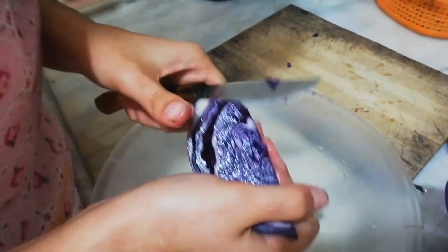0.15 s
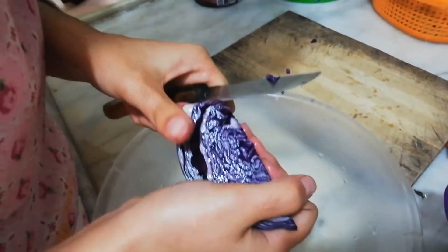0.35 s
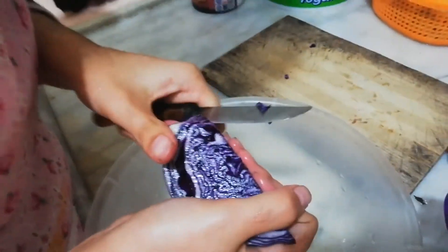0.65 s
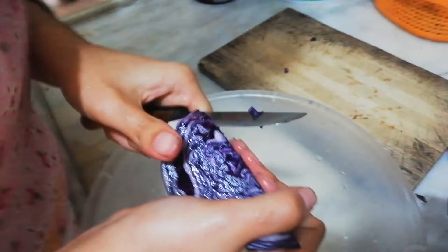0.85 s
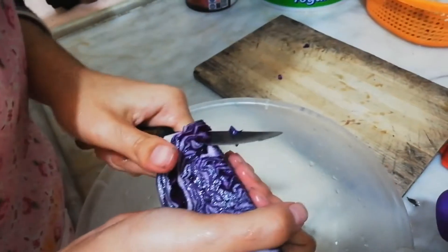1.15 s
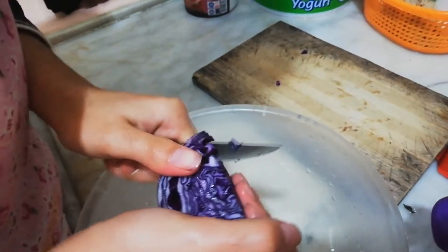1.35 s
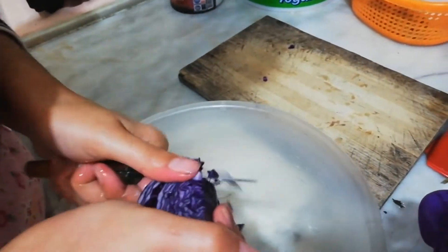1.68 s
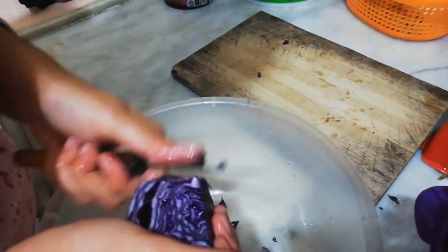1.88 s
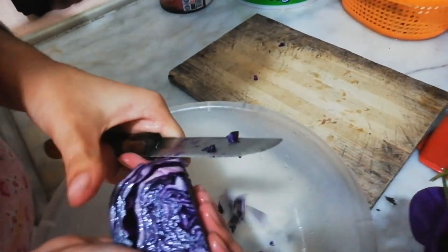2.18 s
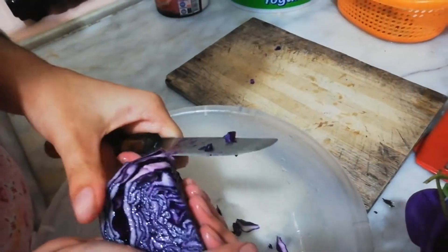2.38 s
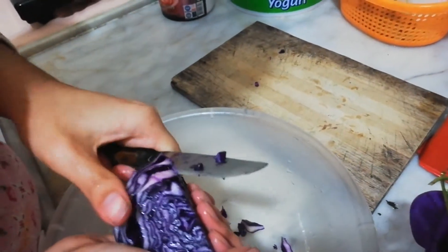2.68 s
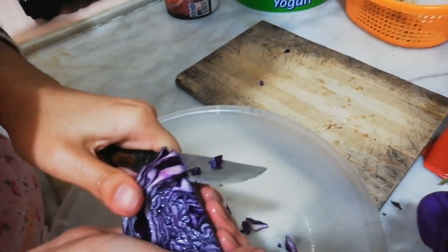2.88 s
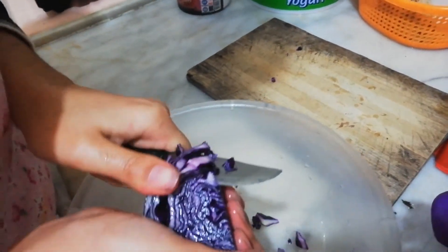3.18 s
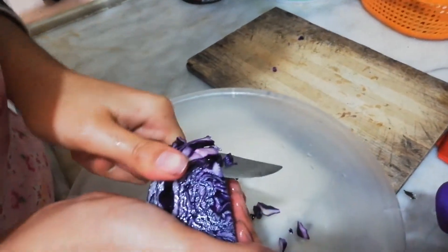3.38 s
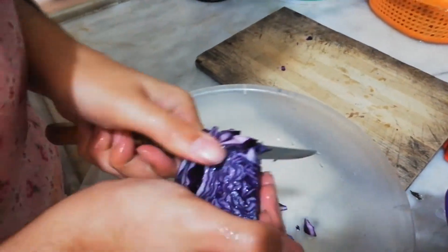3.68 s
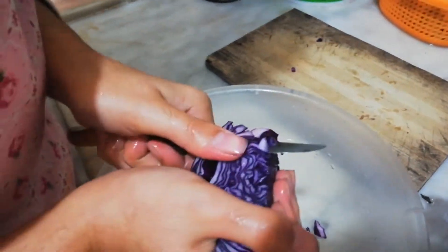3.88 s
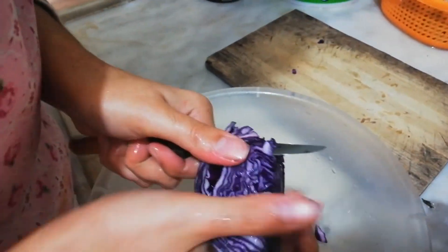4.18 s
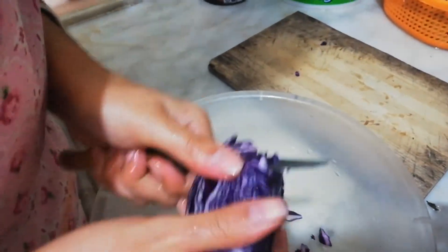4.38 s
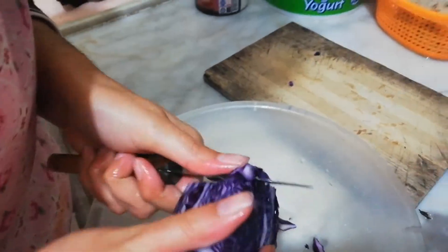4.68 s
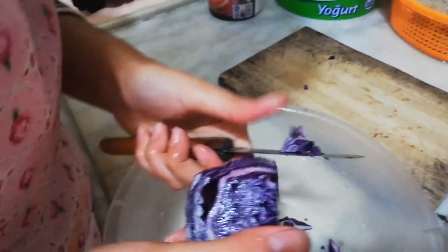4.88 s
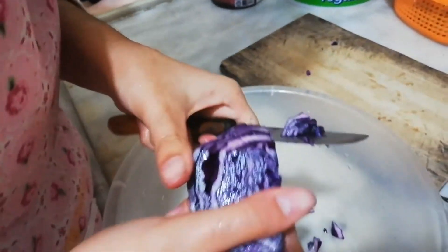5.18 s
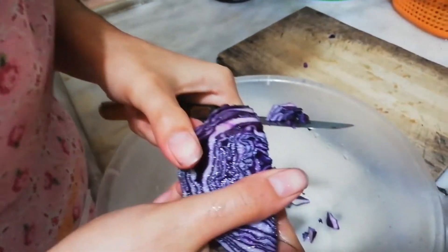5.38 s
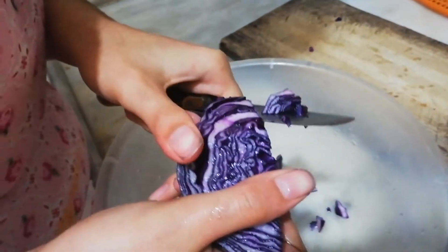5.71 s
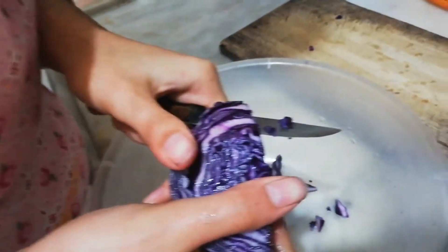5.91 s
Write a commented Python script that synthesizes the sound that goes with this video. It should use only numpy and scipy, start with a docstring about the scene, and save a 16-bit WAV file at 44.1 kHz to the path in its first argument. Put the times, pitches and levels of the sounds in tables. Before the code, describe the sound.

Crackling, squeaky-crisp cuts through dense cabbage leaves, hollow plastic taps, a brief burst of metal clatter across the kitchen, and running water at the end.

```python
"""Cutting a cabbage over a bowl

A knife is pushed through a cabbage held over a plastic bowl: bursts of tiny clicks make the leaves crack,
a fine crackle follows the blade, dull noise swells, and cut pieces land and ring the bowl's modes.
Across the kitchen a pot is set down, a lid settles, cutlery clatters and clinks: impacts ring metal modes.
Soft hollow knocks come from sink, worktop and bowl, and a tap opens with hissing noise.
A low room hum wavers, something whistles faintly, and background noise lies under it all, in stereo."""
import sys
import numpy as np
from scipy import signal
from scipy.fft import rfft, irfft, next_fast_len
from scipy.io import wavfile
from scipy.ndimage import uniform_filter1d

SR = 44100
rng = np.random.default_rng(int(sys.argv[2]) if len(sys.argv) > 2 else 0)


def decibels_to_gain(level_db):
    """Convert a level in decibels to a linear amplitude gain (20 dB per decade)."""
    exponent = np.asarray(level_db, float) / 20
    return 10 ** exponent


def persist_wave(psi):
    """Save psi, clipped to +-1, as 16-bit WAV."""
    counts = np.round(np.clip(psi, -1, 1) * 32767).astype(np.int16)
    wavfile.write(sys.argv[1], SR, np.atleast_2d(counts).T)


N = 266805  # length in samples, about 6 s

# Spectrum tables give relative levels: only the shape counts.
# leaf layers cracking: peak_s, level_db (rms at the peak), dull_db (against the crisp part),
# rise_ms (time to grow 12 dB; 0.1 ms at least), t60_ms (time to die by 60 dB)
LEAF_CRACKS = [(0.192, -45, -7, 2, 7.8), (0.24, -46, 1, 8.5, 5.7), (0.4678, -61.5, 13.5, 10, 49),
               (0.7449, -28, -3, 5, 24), (0.8494, -25, -11, 18, 30), (0.939, -26.5, -12, 4.5, 34),
               (1.1021, -22.5, -41, -19.5, 62), (1.1594, -21, -18, 5.5, 46), (1.4197, -22.5, -17, 2.3, 55),
               (1.5069, -24.5, -17, 3, 34), (1.67, -31.5, 17.5, 4, 15.6), (1.718, -18.5, -40, 9, 19),
               (1.906, -41, -32, 14, 9.9), (2.551, -30, -11, 16, 27), (2.619, -19, -13, 3, 54),
               (2.6392, -21.5, -27, 1, 47), (2.737, -34.5, -15, 4, 38), (2.777, -25, -15.5, 7.5, 50),
               (2.8772, -23, -17, 3.5, 53), (2.9896, -25.5, -20, 8.5, 73), (3.005, -30.5, -12.5, 4, 6),
               (3.121, -30.5, -44, 0.4, 13), (3.1591, -29.5, -14.5, 10, 102), (3.1644, -18.5, -27, 3, 26),
               (3.344, -22, -15, 3, 25), (3.3484, -18, -21, 2, 13.4), (3.5394, -21.5, -18.5, 4, 38),
               (3.6433, -27, -15, 2, 47), (3.6839, -19.5, -23, 2.5, 6.4), (3.773, -34.5, -16, 27, 82),
               (3.8007, -35, -15, 9, 110), (3.9276, -20, -16.5, 5, 30), (4.0955, -21.5, -11, 6, 16),
               (4.1325, -24.5, 2.5, -0.3, 26), (4.17, -36, -1, -1, 19), (4.2051, -32.5, 1.5, 1.5, 9.1),
               (4.32, -22.5, -30, -4, 47), (4.341, -25.5, -19, 3, 52), (4.365, -34.5, -10.5, 6, 43),
               (4.432, -50, -37, 4, 19), (4.5473, -22.5, -15.5, 5, 37), (4.6308, -36, -21, 0.8, 96),
               (4.6883, -32.5, 6, -0.6, 7.5), (4.738, -49.5, 0.5, 7, 18), (4.8988, -28.5, 12.5, 3, 8.4),
               (4.9915, -31.5, 15, 4.5, 10), (5.0635, -42.5, 1, 2, 9), (5.282, -44, -20, -9, 63),
               (5.325, -35, -5.5, 4, 45), (5.334, -23.5, -18, 2.3, 37), (5.5489, -23.5, -13.5, 12, 64),
               (5.808, -18, -12.5, 3, 71), (6.02, -24.5, -14, 14, 16)]
# spectrum of crisp snapping: pitch_hz, level_db
CRISP_SPECTRUM = [(240, -46), (400, -49.5), (2070, -10.5), (2380, -14.5), (2700, -8), (4650, -5.5),
                  (5600, -7.5), (6340, -4.5), (9350, 4), (15400, 1.5), (16400, -122)]
# pressure of the blade sliding through the leaves: time_s, hiss_db
BLADE_PRESSURE = [(0.0, -47), (0.07, -56), (0.3, -80), (0.51, -63.5), (0.83, -69), (1.01, -42),
                  (1.19, -55.5), (1.65, -46.5), (1.82, -65), (2.1, -91), (2.3, -53), (2.59, -53),
                  (2.81, -63.5), (2.93, -52), (3.1, -59), (3.34, -48.5), (3.73, -40), (4.02, -50.5),
                  (4.36, -60.5), (4.93, -62.5), (5.1, -79), (5.25, -60.5), (5.34, -39.5), (5.45, -44)]
# spectrum of the dull part of cracks, slide and swells: pitch_hz, level_db
DULL_SPECTRUM = [(150, -47.5), (300, 9), (700, 6), (1500, 14.5), (3000, 7), (5000, -2.5)]
# dull noise swells, the pot's dying noise, clatter and rustling: peak_s, level_db (at the peak), length_s
DULL_SWELLS = [(0.0, -39, 0.12), (0.74, -38.5, 0.34), (1.05, -38, 0.34), (1.741, -36.5, 0.054),
               (2.204, -25.5, 0.055), (2.418, -56, 0.089), (3.466, -53.5, 0.2), (4.226, -53, 0.26),
               (5.342, -51, 0.09)]
# pieces landing in the bowl: start_s, peak_db, low_modes_db, high_modes_db, second_corner_db (against the first)
LANDINGS = [(1.6683, -4, -58, 10, -6), (1.8661, -4.5, -81, -10, 3), (1.9595, -18.5, -33, -25, -14),
            (2.3608, -29, -61, -27, 2.5), (3.7468, -25.5, -44, 20, -9), (3.8216, -35, 1, 27, -6),
            (4.0759, -10, 4, -4, 2.5), (4.1338, -26, -12, 42, -15), (4.1704, -7.5, -16, -3, -32),
            (4.2527, -16.5, 6, -21, 7), (4.6418, -29.5, -9, 18, -9), (4.6894, -30.5, -37, 34, -18),
            (4.8898, -14, -34, -25, 4), (4.8976, -9.5, -40, 20, 1), (4.9764, -24, -12, 26, 14),
            (4.9863, -11, -17, 22, 21), (4.9895, -12, -27, 2, -6), (5.0598, -26, 7, -21, -2),
            (5.0976, -27, -34, -49, 8), (5.1414, -30.5, -25, -68, -24), (5.192, -20, -70, -1, -34)]
# modes of the bowl when empty: pitch_hz, level_db, t60_s
BOWL_MODES = [(270, -4, .05), (340, -6, .05), (515, -3, .04), (640, -6, .03), (750, -3, .035),
              (880, -5, .03), (1000, -3, .035), (1110, -1, .04), (1230, -1, .035), (1350, -1, .03),
              (1500, -1, .03), (1620, -2, .03), (1750, -4, .025), (1870, -3, .03), (2050, -2, .03),
              (2220, -4, .025), (2400, -4, .025), (2650, -5, .022), (2900, -6, .022), (3150, -8, .02),
              (3400, -9, .02)]
# pot knocked about: start_s, rattle_db, rattle_s, brightness_db_per_octave, ringing_db (against the rattle)
POT_BLOWS = [(.588, -22.5, 0.05, -2.7, -4), (.969, -24.5, 0.032, -2.5, 2), (1.58, -46.5, 0.17, 0.4, -41)]
# modes of the pot, before the high ones are split: pitch_hz, level_db, t60_s
POT_MODES = [(200, -20, .25), (268, -21, .8), (280, -22, 1.2), (366, -27, 1.1), (415, -24, 1.4),
             (655, -5, .4), (710, -1, .3), (790, -4, .4), (1012, -4, .4), (1170, -3, .35), (1222, -1, .3),
             (1351, -2, .2), (1483, -2, .3), (1590, -4, .4), (1700, -5, .4), (1830, -4, .35),
             (1900, -4, .35)]
# spectrum of the pot's broad noise: pitch_hz, level_db
POT_SPECTRUM = [(88, -65), (150, -41.5), (270, -27), (376, -27), (689, 3.5), (1190, -4.5), (1290, -4),
                (5570, -15), (9820, -12), (14500, -10), (16000, -69.5)]
# lid settling: start_s, rattle_db, rattle_s, brightness_db_per_octave, ringing_db (against the rattle)
LID_BLOWS = [(0.0, -37.5, 0.027, 0, -3.5), (.03, -51, 0.041, -1.7, -28)]
# modes of the lid: pitch_hz, level_db, t60_s
LID_MODES = [(232, -4, .3), (296, -11, 1.6), (326, -6, .12), (350, -15, 1.1), (424, -4, .15), (591, 0, .12),
             (704, -3, .15), (2128, -8, .1)]
# spectrum of the lid's broad noise: pitch_hz, level_db
LID_SPECTRUM = [(88, -24), (150, -12), (601, -5), (888, -7), (2180, -0.5), (5570, -8.5), (9820, -4),
                (14200, -5), (16000, -76)]
# cutlery falling: start_s, rattle_db, rattle_s, brightness_db_per_octave, ringing_db (against the rattle)
CUTLERY_BLOWS = [(2.053, -17, 0.0068, -2.5, -6), (2.078, -20, 0.01, 4, -4.5), (2.103, -29, 0.023, 1.5, -22),
                 (2.122, -44, 0.0099, 4.5, 2), (2.163, -22.5, 0.0089, -3, -3),
                 (2.182, -22, 0.0084, -2.5, -25), (2.205, -40, 0.0084, -3, -15),
                 (2.227, -26.5, 0.0038, -7, -16), (2.244, -23, 0.0099, 0.2, -14.5)]
# modes of worktop and cutlery: pitch_hz, level_db, t60_s
CUTLERY_MODES = [(105, -10, .12), (240, -12, .08), (1190, -6, .08), (1922, -2, .07), (2690, 1, .09),
                 (3085, -8, .12), (3811, -3, .08), (3946, -2, .1), (5130, -10, .1), (6503, -5, .07),
                 (6990, -9, .12), (7728, -2, .15), (8600, -6, .12), (9115, -1, .06), (10220, -6, .07)]
# spectrum of broad noise from cutlery and clinks: pitch_hz, level_db
CUTLERY_SPECTRUM = [(35, -51), (60, -41.5), (113, -9), (458, 0.5), (2050, -1), (2650, 2), (3940, -5.5),
                    (4750, -6), (5090, -8), (8920, 3), (14900, -1), (16000, -67)]
# small clinks: start_s, rattle_db, rattle_s, brightness_db_per_octave, ringing_db (against the rattle)
CLINK_BLOWS = [(2.397, -39.5, 0.0071, -3, 2.7), (2.411, -44, 0.0041, -3.7, 2),
               (2.477, -40, 0.0059, -1.8, 2.7), (2.487, -50, 0.003, -2, 2.7)]
# modes of the clinks: pitch_hz, level_db, t60_s
CLINK_MODES = [(420, -6, .04), (900, -9, .03), (2520, -2, .03), (2700, 0, .04), (3820, -9, .025)]
# hollow knocks on sink, worktop and bowl: start_s, peak_db, pitch_hz (lowest mode), t60_s (lowest mode)
HOLLOW_KNOCKS = [(0.002, -27, 595, 0.044), (0.004, -27.5, 248, 0.084), (0.464, -42.5, 585, 0.066),
                 (0.546, -45.5, 625, 0.059), (1.76, -27, 587, 0.059), (1.826, -36.5, 548, 0.034),
                 (2.055, -13.5, 253, 0.095), (3.289, -50, 289, 0.6), (3.374, -44.5, 425, 0.15),
                 (3.406, -37, 341.5, 0.099), (4.256, -34, 580, 0.077), (5.359, -32.5, 444, 0.1),
                 (6.003, -6, 549, 0.055)]
# the tap opening: time_s, level_db
TAP_FLOW = [(5.25, -63), (5.318, -55), (5.438, -40), (5.476, -36.5), (5.73, -31), (6.05, -32)]
# spectrum of the water jet: pitch_hz, level_db
WATER_SPECTRUM = [(88, -75), (150, -32), (459, -8), (1090, -7), (1640, -2.5), (2210, -5.5), (2390, -5),
                  (3470, -2.5), (5450, 1.5), (6500, -3), (14000, 5.5), (15400, -1.5), (16400, -76)]
# sink modes rung by the jet: pitch_hz, width_hz, level_db (against each other)
SINK_MODES = [(1650, 90, -3), (2470, 30, -1), (3960, 70, -4), (4950, 90, -3), (5310, 60, -2),
              (7530, 60, -3), (8980, 80, -3), (9380, 150, -1)]
# the hum wavering in level: time_s, level_db (rms)
HUM_LEVEL = [(0.0, -48.5), (0.57, -57), (0.83, -41.5), (1.16, -80), (1.23, -47), (1.55, -86), (1.82, -44),
             (1.97, -51.5), (2.12, -37), (2.21, -45), (2.63, -50.5), (2.76, -67), (3.0, -44.5), (3.12, -56),
             (4.21, -48), (4.43, -40.5), (4.99, -43.5), (5.26, -35.5), (5.54, -41), (5.68, -58), (5.8, -44),
             (6.05, -57)]
# spectrum of the background noise: pitch_hz, level_db
AIR_SPECTRUM = [(12, -42), (20, 50.5), (65, -27.5), (117, -1.5), (189, -20), (288, -21), (403, -26.5),
                (812, -23.5), (961, -30), (3300, -37.5), (9590, -41), (14600, -34), (16400, -50.5)]
# left-right likeness of diffuse sound: pitch_hz, likeness (-1 opposite to 1 equal, no unit)
PORT_LIKENESS = [(30, -0.075), (130, -0.25), (290, 0.62), (640, -0.79), (1400, -0.019), (15000, -0.025)]
# how long the kitchen echoes: pitch_hz, t60_s
KITCHEN_DECAY = [(200, 0.59), (1000, 0.42), (4000, 0.29), (12000, 0.21)]
# response of the microphone capsules: pitch_hz, level_db
CAPSULE_SPECTRUM = [(20, -11), (6500, 5.5), (8300, 3.5), (9400, 5.5), (10600, 2), (13000, -8),
                    (15000, -8.5)]

BLADE_PAN_DB, BLADE_SWAY_DB = 0.5, 4  # the blade works left of centre and sways
BLUNT_DB_PER_OCTAVE = -2.43  # crisp treble tilt for each dB of the dull part above -0.5 dB
SLIDE_DULL_DB = -12.5  # dull part of the slide under its hiss
SWELL_EDGE_DB = -19  # level at either end of a dull swell, against its peak
BOWL_DAMPING = 1.2  # pieces already in the bowl shorten its ring by this factor
TICK_DB = -27.5  # contact tick of a landing piece, against its peak level
FIRST_BLOW = 3  # height of the first impact over the rattle
RATTLE_T60_S = 0.022
# above this pitch each mode of thin metal has close neighbours, spread by this share of its pitch
CROWD_FROM_HZ, POT_CROWD = 500, 0.07
HUM_HZ, HUM_WANDER_HZ = 115, 1.2
WHINE_S, WHINE_LENGTH_S, WHINE_DB = 3.17, 0.25, -62
WHINE_HZ, WHINE_SAG_HZ_PER_S = 1265, 380
AIR_DB = -51  # rms
NEAR_LEAD_MS, FAR_LEAD_MS = 0.086, -0.545  # how much sooner the left port is reached
MONO_BELOW_HZ, EDGE_HZ = 216, 15600


def evened(x):
    """Scales a sound to rms 1."""
    return x / np.sqrt(np.mean(x ** 2) + 1e-20)


def read(points, hz):
    """Reads a curve between its points, on a logarithmic pitch scale."""
    f, value = np.transpose(points)
    return np.interp(np.log(hz + 1), np.log(f + 1), value)


def add(mix, s, sound, pan_db=0):
    """Adds a sound at a time in seconds; positive pan makes the left louder than the right."""
    part = mix[:, round(s * SR):][:, :sound.shape[-1]]
    part += sound[..., :part.shape[1]] * decibels_to_gain(np.array([[pan_db], [-pan_db]]) / 2)


def slow(size):
    """Slowly drifting chance of rms 1, smoothed twice over size samples."""
    once = uniform_filter1d(rng.standard_normal(N), size)
    return evened(uniform_filter1d(once, size))


def colour(points):
    """Impulse response that starts at once, with unit energy and the given spectrum."""
    log_gain = np.log(decibels_to_gain(read(points, abs(np.fft.fftfreq(4096, 1 / SR)))))
    taps = np.fft.ifft(np.exp(np.conj(signal.hilbert(log_gain)))).real[:2048]
    return taps / np.linalg.norm(taps)


def ring(modes, weight_db=0, damping=1):
    """Impulse response of dying modes (pitch, level, t60), with unit energy."""
    hz, db, t60 = np.transpose(modes)[:, :, None]
    t = np.arange(SR) / SR
    fade = decibels_to_gain(db + weight_db - 60 * t * damping / t60)
    taps = (fade * np.sin(2 * np.pi * hz * t)).sum(0)
    return taps / np.linalg.norm(taps)


def crowded(modes, spread, count=7):
    """Splits every high mode into a few weaker neighbours of the same total energy."""
    split = []
    for hz, db, t60 in modes:
        if hz > CROWD_FROM_HZ:
            for _ in range(count):
                near_hz = hz * (1 + spread * rng.uniform(-0.89, 1))
                split.append((near_hz, db - 10 * np.log10(count), t60))
    return split + [mode for mode in modes if mode[0] <= CROWD_FROM_HZ]


def grains(shape, per_s, spread_db, haze):
    """Random clicks, a few of them large, over fine noise."""
    size = decibels_to_gain(spread_db * np.minimum(rng.exponential(1, shape), 4))
    size = size * rng.choice([-1, 1], shape)
    clicks = evened(size * (rng.random(shape) < per_s / SR))
    return evened(clicks + haze * rng.standard_normal(shape))


def diffuse(points, patchy_db):
    """Noise from random short-time spectra with drifting patches, partly alike in both ports."""
    frames, hz = N // 256 + 5, np.fft.rfftfreq(1024, 1 / SR)
    a, b, c, d, patches = rng.standard_normal((frames, 513, 5)).T
    patches = uniform_filter1d(patches, size=12, axis=0)  # across pitch
    patches = evened(uniform_filter1d(patches, size=10, axis=1))  # across time
    same = np.clip(read(PORT_LIKENESS, hz), -1, 1)[:, None]
    left = a + 1j * b
    right = same * left + np.sqrt(1 - same ** 2) * (c + 1j * d)
    spectra = np.array([left, right]) * decibels_to_gain(read(points, hz)[:, None] + patchy_db * patches)
    return evened(signal.istft(spectra, nperseg=1024, noverlap=768)[1][:, :N])


def high_pass(x, low_hz):
    """Weakens low pitches, as small things move air poorly there."""
    return signal.sosfilt(signal.butter(2, low_hz, "high", fs=SR, output="sos"), x)


def cracks():
    """Each crack is a clump of snapping cells that swells, peaks and dies, shaded differently in each port."""
    out, t, dull = np.zeros((2, N)), np.arange(-800, 3200) / SR, colour(DULL_SPECTRUM)
    # for each crack, one set of snaps shared by both ports and one for each port
    snaps = grains((len(LEAF_CRACKS), 3, 4000), 6000, 4.9, 0.89)
    pans_db = BLADE_PAN_DB + BLADE_SWAY_DB * slow(size=6000)
    for (s, db, dull_db, rise_ms, t60_ms), snap in zip(LEAF_CRACKS, snaps):
        rise_ms = max(rise_ms, 0.1)
        swell = decibels_to_gain(np.where(t < 0, 12 * t / rise_ms, -60 * t / t60_ms) * 1000)
        swell *= t > -1.2 * rise_ms / 1000  # the first fibre gives way suddenly
        clump = (0.81 * snap[0] + 1.24 * snap[1:]) * swell
        clump *= np.linalg.norm(swell) / np.linalg.norm(clump, axis=1, keepdims=True)
        tilt_db = BLUNT_DB_PER_OCTAVE * max(dull_db + 0.5, 0)
        crisp = colour([(f, d + tilt_db * np.log2(f / 4000)) for f, d in CRISP_SPECTRUM])
        sound = signal.fftconvolve(clump, (crisp + decibels_to_gain(dull_db) * dull)[None])
        add(out, s + t[0], decibels_to_gain(db) * sound, pans_db[round(s * SR)])
    return out


def slide():
    """The blade tears fibres as it is pressed, a fine crackle over dull noise that also swells by itself."""
    t = np.arange(N) / SR
    pressure = decibels_to_gain(np.interp(t, *np.transpose(BLADE_PRESSURE), right=-90))
    swells = sum(decibels_to_gain(db + SWELL_EDGE_DB * abs(2 * (t - s) / length)) for s, db, length in DULL_SWELLS)
    crackle = grains((2, N), 1700, 2.1, 0.4)
    hiss = signal.oaconvolve(crackle, colour(CRISP_SPECTRUM)[None])[:2, :N]
    dull_noise = diffuse(DULL_SPECTRUM, patchy_db=1.5)
    return pressure * hiss + (decibels_to_gain(SLIDE_DULL_DB) * pressure + swells) * dull_noise


def drops():
    """A soft piece lands on two corners in quick turn; each port hears its own mix of the bowl's modes."""
    out, hz = np.zeros((2, N)), np.array(BOWL_MODES)[:, :1]
    push = signal.windows.hann(16)  # soft contact
    spots = rng.standard_normal((len(LANDINGS), 2, len(BOWL_MODES), 1))
    tumbles = grains((len(LANDINGS), 2, 2500), 1800, 1.35, 0.067)
    tumbles = tumbles * decibels_to_gain(-60 * np.arange(2500) / SR / 0.053)
    tick_fade = decibels_to_gain(-60 * np.arange(300) / SR / 0.0072)
    for (s, db, low_db, high_db, second_db), spot, tumble in zip(LANDINGS, spots, tumbles):
        tilt_db = read([(450, low_db), (1250, 0.017), (2500, high_db)], hz)
        modes = np.array([ring(BOWL_MODES, tilt_db + 2.5 * own, BOWL_DAMPING)[:4000] for own in spot])
        blow = 0.13 * tumble  # the piece rocks and settles
        blow[:, 0] = 1
        blow[:, 90] += decibels_to_gain(second_db)  # second corner, 2 ms later
        struck = signal.fftconvolve(modes, blow, axes=1)
        sound = high_pass(signal.fftconvolve(struck, push[None]), low_hz=216)
        add(out, s, decibels_to_gain(db) * sound / abs(sound).max(), 0.7)
        add(out, s, decibels_to_gain(db + TICK_DB) * tumble[:, :300] * tick_fade, 0.7)
    return out


def rattle(hits, modes, body, pan_db, count=5):
    """Bursts of small impacts spill broad noise and ring the metal, other modes at each blow."""
    out, t = np.zeros((2, N)), np.arange(8000) / SR
    impacts = grains((len(hits), 8000), 3000, 3.4, 0.93)
    spots, hz = rng.standard_normal((len(hits), len(modes), 1)), np.array(modes)[:, :1]
    for (s, db, length, tilt_db, ring_db), impact, spot in zip(hits, impacts, spots):
        burst = impact * decibels_to_gain(-60 * np.maximum(t - length, 0) / RATTLE_T60_S)
        burst[:count] += FIRST_BLOW * signal.windows.hann(count)
        broad = colour([(f, d + tilt_db * np.log2(f / 2000)) for f, d in body])
        ringing = ring(modes, 0.5 * spot + tilt_db * np.log2(hz / 2000))
        add(out, s, decibels_to_gain(db) * signal.fftconvolve(burst, broad), pan_db)
        add(out, s, decibels_to_gain(db + ring_db) * signal.fftconvolve(burst, ringing), pan_db)
    return out


def pot():
    """The pot's thin metal rings in crowds of close modes."""
    return rattle(POT_BLOWS, crowded(POT_MODES, POT_CROWD), POT_SPECTRUM, -6.5)


def lid():
    """A settling lid rattles and rings its own modes."""
    return rattle(LID_BLOWS, LID_MODES, LID_SPECTRUM, 0.29)


def cutlery():
    """Falling cutlery strikes in short bursts that ring steel and worktop."""
    return rattle(CUTLERY_BLOWS, CUTLERY_MODES, CUTLERY_SPECTRUM, -4.0)


def clinks():
    """Small clinks after the clatter are brief impacts with fast-dying modes."""
    return rattle(CLINK_BLOWS, CLINK_MODES, CUTLERY_SPECTRUM, -5.5)


def knocks():
    """A hollow body, struck softly, answers with one low mode and weaker, shorter ones above."""
    out = np.zeros((2, N))
    for s, db, hz, t60 in HOLLOW_KNOCKS:
        modes = ring([(hz, 0, t60), (1.234 * hz, -6, 0.6 * t60), (2.1 * hz, -10, 0.39 * t60),
                      (3.1 * hz, -8, 0.19 * t60), (3.8 * hz, -6, 0.094 * t60), (5.3 * hz, -6, 0.089 * t60)])
        sound = high_pass(signal.fftconvolve(modes, signal.windows.hann(14)), low_hz=227)
        add(out, s, decibels_to_gain(db) * sound / abs(sound).max(), -2.5)
    return out


def tap():
    """A jet of water hisses and splashes on the steel sink; gulps of splash ring one mode or another."""
    s, db = np.transpose(TAP_FLOW)
    jet = diffuse(WATER_SPECTRUM, patchy_db=1.1)
    for hz, width, mode_db in SINK_MODES:
        gulps = decibels_to_gain(1.4 * evened(uniform_filter1d(rng.standard_normal(N), size=2500)))
        splash = gulps * grains((2, N), 2500, 7.1, 0.88)
        mode = ring([(hz, 0, 2.2 / width)])[:4000]  # a wider mode dies sooner
        jet += decibels_to_gain(mode_db - 14) * signal.oaconvolve(splash, mode[None])[:2, :N]
    return decibels_to_gain(np.interp(np.arange(N) / SR, s, db, left=-90)) * jet


def hum():
    """A low room hum near 115 Hz, made as a sine, swells and fades and drifts a little in pitch."""
    hz = HUM_HZ + HUM_WANDER_HZ * slow(size=5000)
    level = decibels_to_gain(np.interp(np.arange(N) / SR, *np.transpose(HUM_LEVEL)))
    return np.sqrt(2) * level * np.sin(2 * np.pi * np.cumsum(hz) / SR)


def whine():
    """A faint whistle: a tone of sagging pitch, blurred by noise in its strength and phase."""
    t = np.arange(0, WHINE_LENGTH_S, 1 / SR)
    fuzz = evened(uniform_filter1d(rng.standard_normal((SR, 2)), size=900, axis=0)).T[:, :len(t)]
    phase = 2 * np.pi * np.cumsum(WHINE_HZ - WHINE_SAG_HZ_PER_S * t) / SR
    tone = (1 + 0.5 * fuzz) * np.sin(phase + 0.67 * fuzz[::-1])
    out = np.zeros((2, N))
    add(out, WHINE_S, decibels_to_gain(WHINE_DB) * tone * signal.windows.tukey(len(t), 0.2))
    return out


def air():
    """Background noise, strongest at very low pitch, with drifting patches."""
    return decibels_to_gain(AIR_DB) * diffuse(AIR_SPECTRUM, patchy_db=3.0)


def ports(x, lead_ms):
    """The port farther from the source is reached a little later."""
    size = next_fast_len(N + 4096)
    late_s = np.array([[max(-lead_ms, 0)], [max(lead_ms, 0)]]) / 1000
    turn = np.exp(-2j * np.pi * np.fft.rfftfreq(size, 1 / SR) * late_s)
    return irfft(rfft(x, size) * turn, size)[:, :N]


def room(x, gap_ms):
    """Kitchen echo: sparse taps of random sign, each band dying at its own speed."""
    taps, first = np.zeros((2, SR)), int(abs(gap_ms) * SR / 1000)
    at = np.arange(0, SR - 20, 20) + rng.integers(0, 20, (2, SR // 20 - 1))
    signs = rng.choice([-1., 1.], at.shape)
    np.put_along_axis(taps, at, signs * (at > first), 1)
    hz, t, bands = signal.stft(taps, SR, nperseg=256)
    fade = decibels_to_gain(-60 * t / read(KITCHEN_DECAY, hz)[:, None])
    tail = signal.istft(bands * fade, SR, nperseg=256)[1]
    return signal.fftconvolve(x, tail / np.linalg.norm(tail[0]), axes=1)[:, :N]


def scene():
    """Mixes the near, far and knocked sources with their echo, then the other sounds without echo."""
    near = cracks() + drops()
    far = high_pass(pot() + lid(), low_hz=122) + clinks() + cutlery()
    knocked = knocks()
    direct = ports(near + knocked, NEAR_LEAD_MS) + ports(far, FAR_LEAD_MS)
    echo = room(decibels_to_gain(-14.0) * near + decibels_to_gain(-1.5) * far + decibels_to_gain(-3.5) * knocked, gap_ms=1)
    return direct + echo + slide() + tap() + hum() + whine() + air()


def band_limit(x):
    """A steep low-pass at the top of the band."""
    return signal.sosfilt(signal.butter(12, 16500, fs=SR, output="sos"), x)


def record(dry):
    """Long waves reach both ports alike; the capsules resonate and the treble is cut off."""
    mid = (dry[0] + dry[1]) / 2
    side = high_pass((dry[0] - dry[1]) / 2, MONO_BELOW_HZ)  # little left-right difference in the bass
    both = np.array([mid + side, mid - side])
    heard = signal.oaconvolve(both, colour(CAPSULE_SPECTRUM)[None])[:2, :N]
    edge = signal.firwin(255, EDGE_HZ, window=("kaiser", 8), fs=SR)
    mix = signal.oaconvolve(heard, edge[None], "same")
    return band_limit(mix)


dry = scene()
out = record(dry)
persist_wave(out)
```